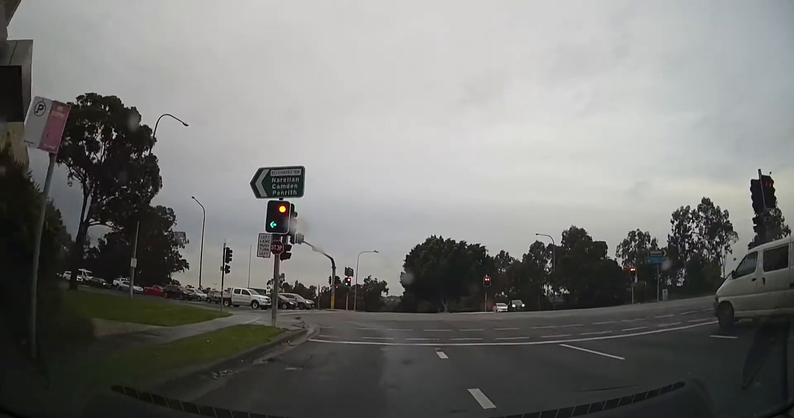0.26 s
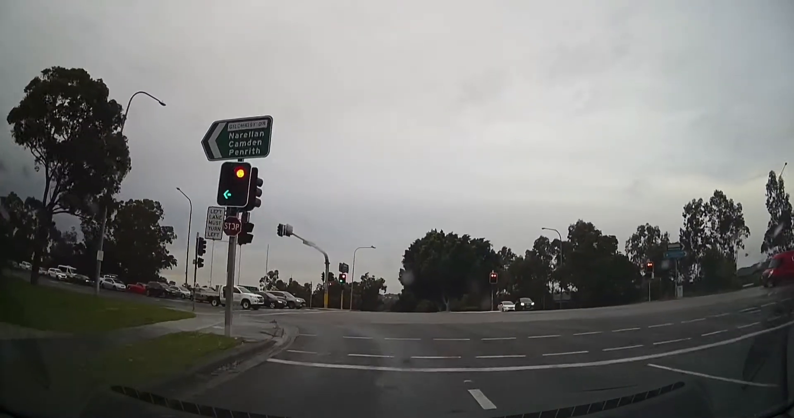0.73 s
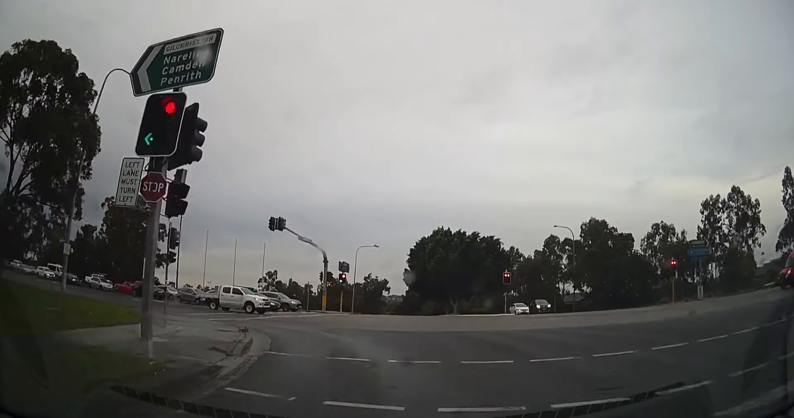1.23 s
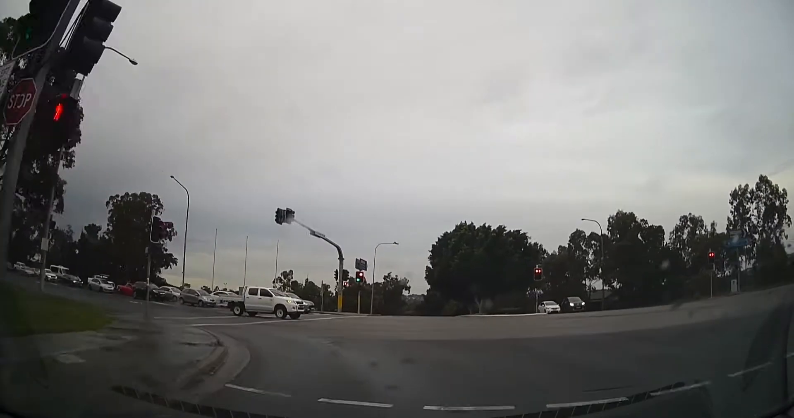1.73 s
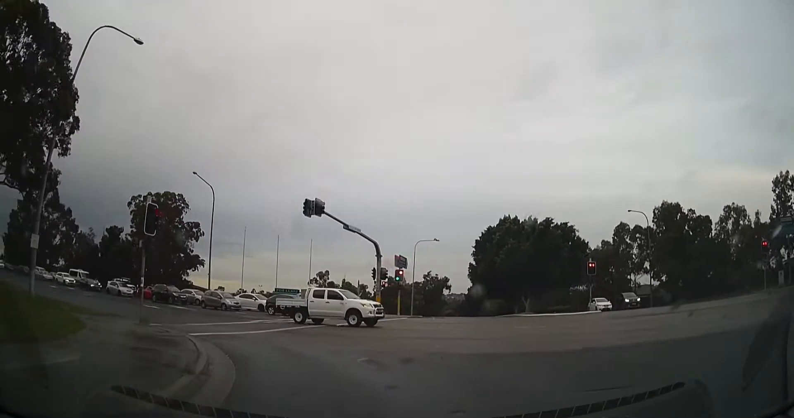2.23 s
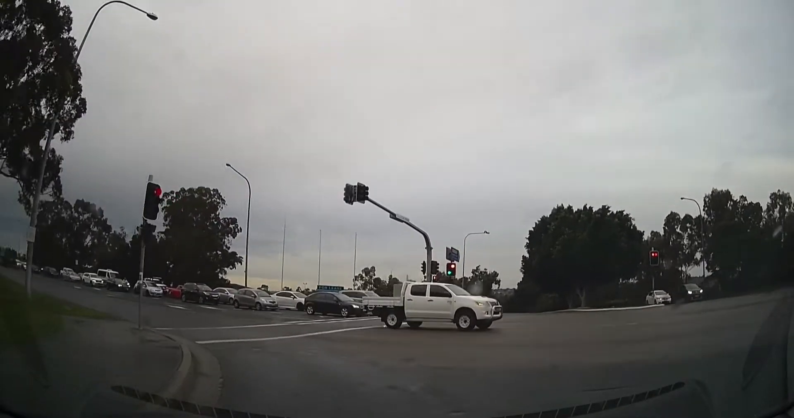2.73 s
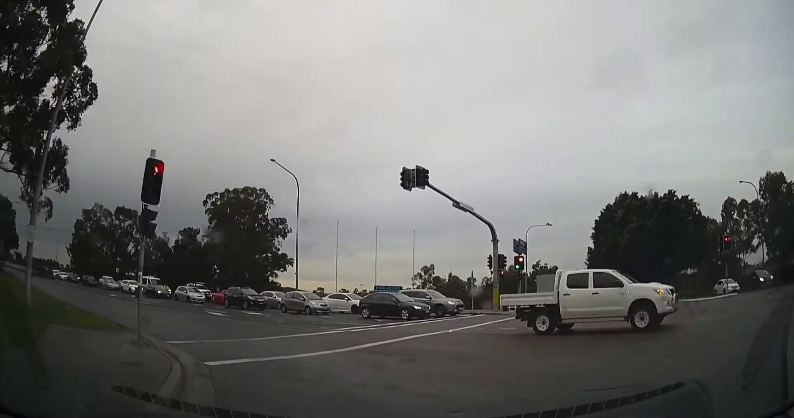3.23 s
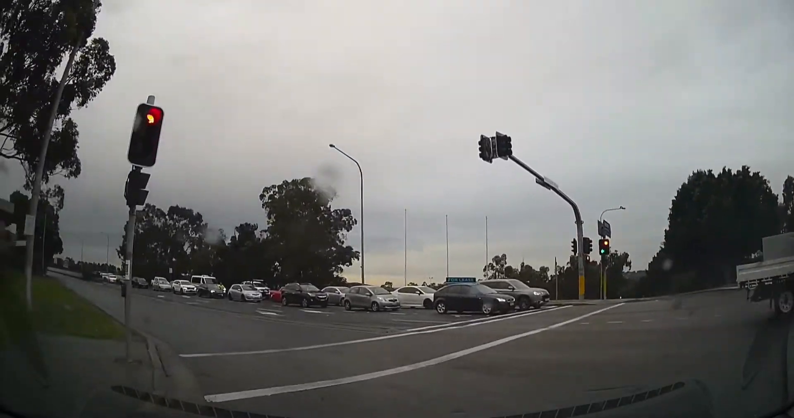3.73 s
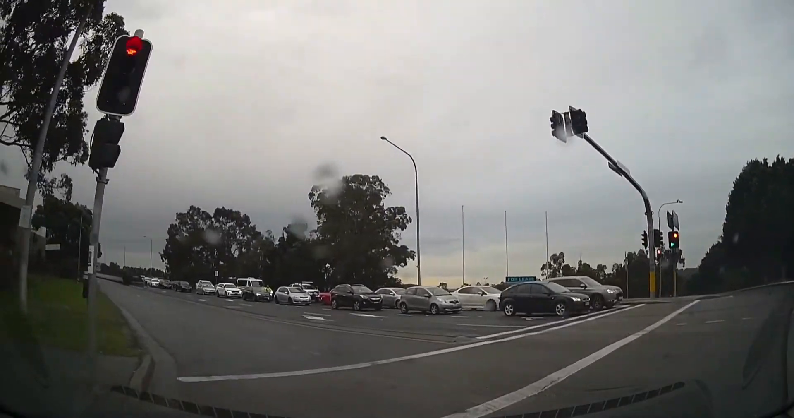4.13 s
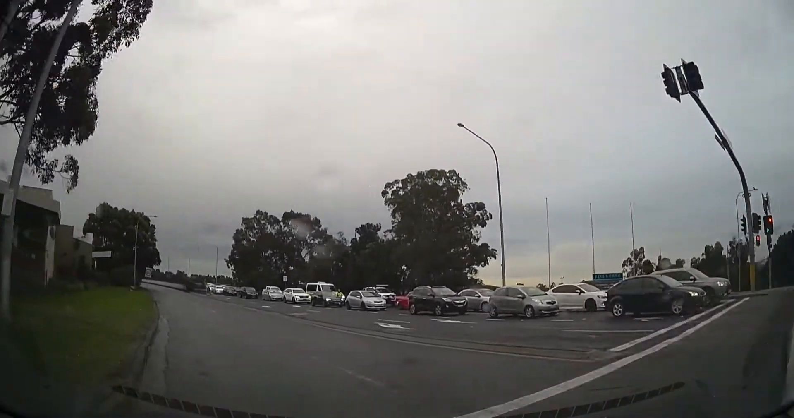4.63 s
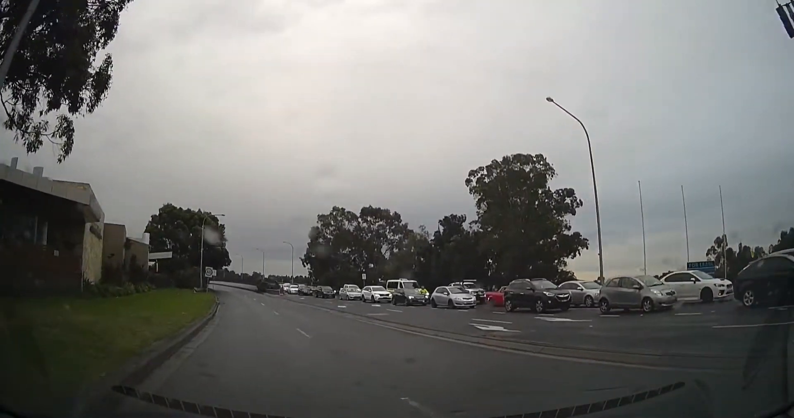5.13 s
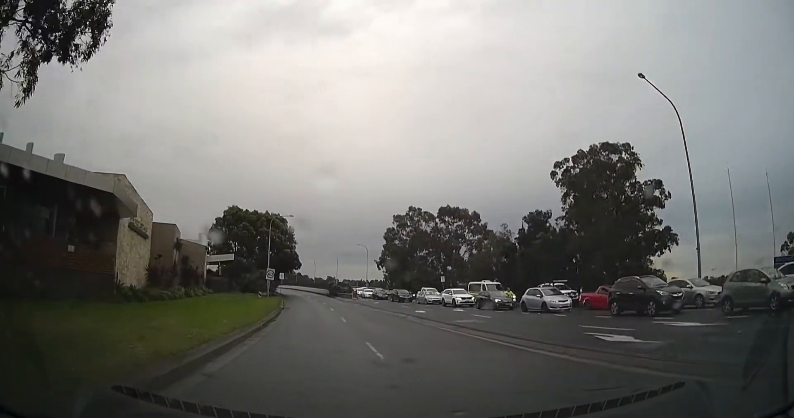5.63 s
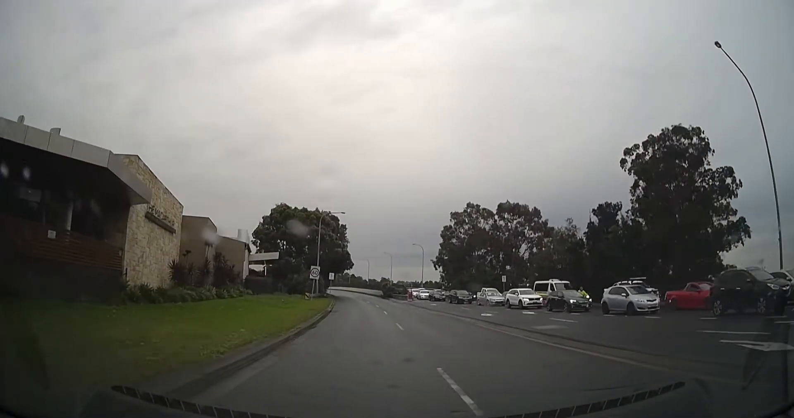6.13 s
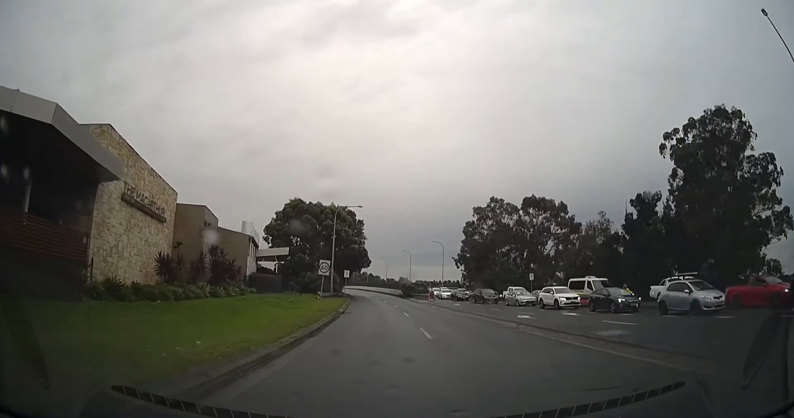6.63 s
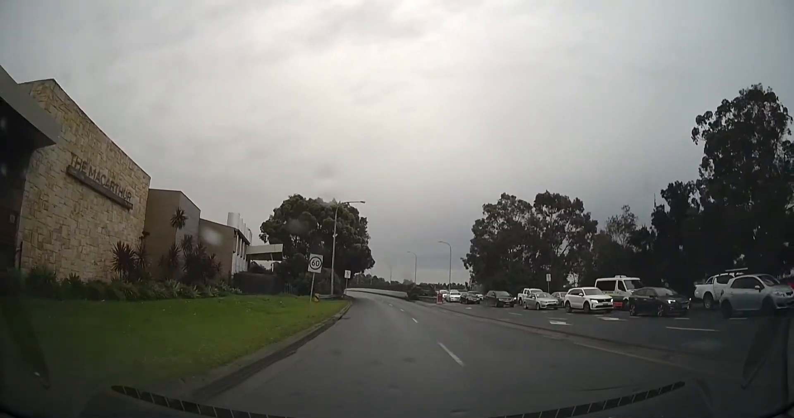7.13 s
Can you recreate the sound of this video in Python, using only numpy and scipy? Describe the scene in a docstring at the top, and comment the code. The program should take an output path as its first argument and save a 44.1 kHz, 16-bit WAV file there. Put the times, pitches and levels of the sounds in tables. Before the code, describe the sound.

The sound is heard inside a moving car: a continuous low road rumble with engine hum and tyre drone. The indicator ticks softly and evenly from about 0.3 seconds until just after 6. The tyres swish faintly on the wet road around 1 second, and the engine sags a little as the car slows for the turn. A plastic snap and a soft bump come just after 2 seconds, then a hollow panel knock at 2.5. From about 4 seconds the car picks up speed and the rumble swells over rough asphalt, strongest between 4.5 and 5, with light tyre slaps. A low thump lands at 5.6 seconds. Loose plastic trim clicks around it and at 6, then rattles and knocks sharply at 6.5. The rumble carries on to the end with faint wet swishes and a brief surge of tyre roar.

```python
"""Car turning on a wet road, from inside

The road shakes the cabin into a low rumble that swells over rough patches. The engine hums;
the tyres drone, roar and swish. Loose plastic trim clicks, knocks and rattles.
The indicator relay ticks against its stops until the turn is done."""
import sys
import numpy as np
from scipy import signal
from scipy.fft import rfft, irfft
from scipy.io import wavfile
from scipy.ndimage import uniform_filter1d

SR = 44100
rng = np.random.default_rng(int(sys.argv[2]) if len(sys.argv) > 2 else 0)


def bounce(signal):
    """Save signal as a 16-bit WAV file at the path given by the first command-line argument."""
    frames = np.transpose(np.atleast_2d(signal))
    limited = np.clip(frames, -1, 1)
    pcm = np.round(limited * 32767).astype(np.int16)
    wavfile.write(sys.argv[1], SR, pcm)


N = 325458
T = np.arange(N) / SR


def undb(db):
    """Decibels to gain."""
    return 10 ** (np.asarray(db) / 20)


def unit(x):
    """Scale to rms 1."""
    return x / np.sqrt(np.mean(x ** 2))


def add(out, start_s, sound):
    """Mix a sound in at start_s."""
    i = int(start_s * SR)
    out[i:i + len(sound)] += sound[:N - i]


def curves(table):
    """Each column after t/s, interpolated per sample."""
    times_s, *columns = np.transpose(table)
    return [np.interp(T, times_s, column) for column in columns]


def swells(events):
    """Gain of bell-shaped swells; lengths at half power."""
    power = sum(undb(db) ** 2 * .5 ** ((2 * (T - mid_s) / length_s) ** 2)
                for mid_s, length_s, db in events)
    return np.sqrt(power)


def walk(rate_hz):
    """Smooth random drift, spread near 1."""
    step = int(SR / rate_hz)
    return 1.29 * uniform_filter1d(np.repeat(rng.standard_normal(N // step + 1), step), step)[:N]


def noise(spectrum, flutter_db=0):
    """Noise, optionally fluttering, shaped to a spectrum with 20 dB/octave skirts; rms 1."""
    white = rng.standard_normal(N) * undb(flutter_db)
    hz, db = np.transpose(spectrum)
    bins_hz = np.maximum(np.fft.rfftfreq(N, 1 / SR), 1)
    outside_oct = np.abs(np.log2(bins_hz / np.clip(bins_hz, hz[0], hz[-1])))
    shape_db = np.interp(np.log(bins_hz), np.log(hz), db) - 20 * outside_oct
    return unit(irfft(rfft(white) * undb(shape_db), N))


def even_noise(spectrum, window_s):
    """Shaped noise, levelled to a running rms of 1."""
    x = noise(spectrum)
    return x / np.sqrt(uniform_filter1d(x ** 2, int(window_s * SR)))


def narrow_noise(hz, width_hz):
    """Noise band with a moving centre; rms 1."""
    phase = 2 * np.pi * np.cumsum(hz) / SR
    return unit(walk(width_hz) * np.cos(phase) + walk(width_hz) * np.sin(phase))


def contact(modes, t60_s, size=8192):
    """A sharp contact and its dying chatter ring broad modes; loudest 3 ms at rms 1."""
    t = np.arange(size) / SR
    chatter = rng.standard_normal(size) * undb(-60 * t / t60_s)
    chatter[0] += 9  # first impact
    ring = 0
    for hz, width_hz, db in modes:
        band = signal.butter(2, [hz - width_hz / 2, hz + width_hz / 2], "band", fs=SR, output="sos")
        ring = ring + undb(db) * unit(signal.sosfilt(band, chatter))
    return ring / np.sqrt(uniform_filter1d(ring ** 2, size=132).max())


def blows(events, modes, push_s, size=20000):
    """Soft blows: each short push sets damped modes swinging."""
    out, t = np.zeros(N), np.arange(size) / SR
    for start_s, level_db in events:
        ring = sum(undb(db - 60 * t / t60_s) * np.sin(2 * np.pi * hz * rng.normal(1, .01) * t)
                   for hz, db, t60_s in modes)
        ring *= 1 - np.exp(-(t / push_s) ** 2)
        add(out, start_s, undb(level_db) * np.sqrt(2) * ring / np.abs(ring).max())
    return out


def cabin_echoes(x, echo_db, t60_s, count=24):
    """Early reflections from glass and roof comb the sound."""
    lags_s = rng.uniform(0.002003, 0.041, count)
    gains = rng.choice([-1, 1], count) * undb(-60 * lags_s / t60_s)
    response = np.zeros(SR // 10)
    response[(lags_s * SR).astype(int)] = undb(echo_db) * gains / np.linalg.norm(gains)
    response[0] = 1
    return signal.fftconvolve(x, response / np.linalg.norm(response))[:N]


# car speed: t/s, v/(km/h)
SPEED = [(0, 29.8), (.5, 28.5), (1.5, 23), (2.6, 21.8), (3.4, 22.4), (4.3, 26.5), (5, 32.8), (6, 35.5),
         (7.38, 36.6)]
def rolling_db(cruise_db, doubling_db, cruise_kmh=30):
    """Rolling noise level, rising with each doubling of speed."""
    (kmh,) = curves(SPEED)
    return cruise_db + doubling_db * np.log2(kmh / cruise_kmh)


# rough patches: start/s, length/s, shake/dB, heave/dB, boom/dB, drone/dB
PATCHES = [(0.291, 0.48, 2, 7.5, 3, 0.5), (1.835, 0.15, 2.5, 9.5, 8, -0.5), (2.325, 0.41, 2, -2, 0.5, 2),
           (3.866, 0.28, 3.5, 0.5, 10.5, 0.5), (4.11, 0.21, 6.5, -9, -3, -2),
           (4.448, 0.28, 12.5, 8.5, 15.5, 7), (4.766, 0.39, 9, 18.5, 15, -2.5),
           (5.165, 0.23, 9.5, 4.5, 4.8, -1.5), (5.487, 0.2, 9, 0.5, 12.5, -0.5),
           (6.593, 0.1, -5.5, 0, 15, 1), (6.886, 0.19, -0.5, -4, 17.5, -0.5)]
def roughness_db(edge_s=0.14):
    """Shake, heave, boom and drone relative to smooth road, ramped at patch edges."""
    extra_db = 0
    for start_s, length_s, *patch_db in PATCHES:
        inside_s = np.minimum(T - start_s, start_s + length_s - T)
        extra_db = extra_db + np.outer(patch_db, np.clip(.5 + inside_s / edge_s, 0, 1))
    return extra_db


# rub spectrum: f/Hz, level/dB
RUB_SPECTRUM = [(2350, -23.5), (2700, -6), (2820, -8), (2950, -5), (3100, -10.5), (3400, -27.5)]
# rubs: centre/s, length/s, level/dB
RUBS = [(1.45, 0.32, -71.5), (2.3, 1, -69.5), (3.98, .42, -63), (7.33, 0.12, -59)]
# cornering whine: t/s, f/Hz, level/dB
WHINE = [(1.3, 3040, -90), (1.55, 2980, -77), (2, 3003, -72), (2.3, 2925, -72), (2.6, 2960, -69.5),
         (2.9, 2942, -75), (3.2, 2910, -89)]
# hiss spectrum: f/Hz, level/dB
HISS_SPECTRUM = [(1500, 2), (3000, -1.5), (4000, -3), (5300, -2.5), (7200, -7), (8500, -12)]
def hiss():
    """Faint steady hiss; thin rubs and a wavering whine come and go."""
    rub = swells(RUBS) * noise(RUB_SPECTRUM)
    hz, db = curves(WHINE)
    whine = undb(db) * narrow_noise(hz * (1 + 0.0066 * walk(12)), width_hz=70)
    return rub + whine + undb(-66) * noise(HISS_SPECTRUM)


# spray spectrum: f/Hz, level/dB
SPRAY_SPECTRUM = [(2800, -15), (4000, -6.5), (4700, -4.5), (5250, -3), (5900, -5), (7200, -11), (8500, -18)]
# swishes: centre/s, length/s, level/dB
SWISHES = [(0.848, 0.18, -58), (1.274, 0.25, -64), (6.723, 0.17, -66.5), (7.029, 0.24, -61.5)]
def spray(ring_hz=5210, sag_hz_per_s=1800, ring_db=-5):
    """The water film swishes under the tyres, each swish with a sinking resonance."""
    out = swells(SWISHES) * noise(SPRAY_SPECTRUM, flutter_db=1.8 * walk(240))
    for mid_s, length_s, db in SWISHES:
        ring = narrow_noise(ring_hz - sag_hz_per_s * (T - mid_s), width_hz=540)
        out += undb(ring_db) * swells([(mid_s, length_s, db)]) * ring
    return out


# carcass spectrum: f/Hz, level/dB
DRONE_SPECTRUM = [(150, -18.5), (210, 6.5), (260, 0), (330, -3.5), (410, -10), (510, -10), (590, -16.5),
                  (660, -28), (900, -25)]
# tread spectrum: f/Hz, level/dB
ROAR_SPECTRUM = [(350, -6), (510, -1), (640, -2.5), (760, 4), (870, -5), (1030, 0), (1110, -1.5),
                 (1250, -2.5), (1400, -9), (1630, -20), (1880, -13), (2400, -24), (2950, -23),
                 (3600, -31.5), (7000, -37.5)]
def tyres(surge_s=7.33, surge_length_s=0.078, surge_db=-40.5):
    """Carcass drone, spray and tread roar, which flutters with the asphalt grain and surges once."""
    *_, drone_db = roughness_db()
    drone = undb(rolling_db(-39, doubling_db=8.5) + drone_db) * noise(DRONE_SPECTRUM)
    surge = swells([(surge_s, surge_length_s, surge_db)])
    roar_gain = np.hypot(undb(rolling_db(-48, doubling_db=8.5)), surge)
    roar = roar_gain * noise(ROAR_SPECTRUM, flutter_db=1.2 * walk(45))
    return drone + cabin_echoes(roar + spray(), echo_db=-8.5, t60_s=0.028)


# tread slaps: t/s, level/dB
SLAPS = [(4.39, -40), (4.511, -40.5), (4.639, -42), (4.719, -41), (4.851, -39.5)]
# tread and wheel arch modes: f/Hz, width/Hz, level/dB
ARCH_MODES = [(534, 140, 4.5), (696, 120, 1), (953, 160, 0)]
def slaps():
    """The tread slaps broken asphalt and rings the wheel arches."""
    out = np.zeros(N)
    for start_s, db in SLAPS:
        add(out, start_s, undb(db) * contact(ARCH_MODES, t60_s=0.56))
    return out


# engine run: t/s, firing rate/Hz, level/dB
ENGINE_RUN = [(0, 42, -38.5), (.6, 38.37, -36), (1.2, 38.2, -34), (1.85, 43.78, -39.5), (2.3, 38.33, -33),
              (2.8, 36.52, -27), (3.3, 39.54, -34), (3.8, 41.2, -41), (5, 47.4, -33.5), (6, 47.5, -34),
              (7.38, 51.87, -42)]
# firing harmonics: order, level/dB
ENGINE_ORDERS = [(1, 5), (2, -18), (3, -11.5), (4, -6.5)]
def engine():
    """Low firing orders sag through the corner and pick up after it."""
    firing_hz, level_db = curves(ENGINE_RUN)
    phase = 2 * np.pi * np.cumsum(firing_hz * (1 + .015 * walk(9))) / SR
    hum = 0
    for order, order_db in ENGINE_ORDERS:
        waver_db = 2.2 * walk(7)
        hum = hum + undb(order_db + waver_db) * np.sin(order * phase + rng.uniform(0, 2 * np.pi))
    return undb(level_db) * unit(hum)


# panel shake spectrum: f/Hz, level/dB
SHAKE_SPECTRUM = [(50, -23), (64, -11), (78, 2), (92, -4), (109, 2.5), (128, -0.5), (152, -8), (171, -5),
                  (188, -11), (205, -7), (240, -21.5), (280, -24.5), (400, -42)]
# body heave spectrum: f/Hz, level/dB
HEAVE_SPECTRUM = [(12, -24), (22, -7), (33, -2), (47, 5), (54, -3.5), (63, -11), (78, -16), (90, -21),
                  (110, -35.5)]
# cabin air spectrum: f/Hz, level/dB
BOOM_SPECTRUM = [(95, -24.5), (105, -6.5), (109, -6.5), (113, -7), (124, -29.5)]
# wheels dropping over road joints: t/s, level/dB
BUMPS = [(2.15, -21), (5.60, -12)]
# car body modes: f/Hz, level/dB, t60/s
BODY_MODES = [(40, 4.5, 0.29), (74.2, -5, 0.069), (105, 3.5, 0.12)]
def road():
    """The road shakes the panels, heaves and bumps the body and sets the cabin air booming."""
    shake_db, heave_db, boom_db, _ = roughness_db()
    uneven_asphalt_db = 2 * walk(11)
    shake_db += rolling_db(-29.5, doubling_db=8) + uneven_asphalt_db
    heave_db += rolling_db(-33, doubling_db=7)
    boom_db += rolling_db(-37, doubling_db=7)
    shake = undb(shake_db) * even_noise(SHAKE_SPECTRUM, window_s=0.075)
    heave = undb(heave_db) * even_noise(HEAVE_SPECTRUM, window_s=0.41)
    boom = undb(boom_db) * even_noise(BOOM_SPECTRUM, window_s=0.31)
    return shake + heave + boom + blows(BUMPS, BODY_MODES, push_s=0.018)


# trim clicks: t/s, level/dB, f/Hz favoured by the struck spot, t60/s, falloff from f/(dB/octave)
TRIM_CLICKS = [(0.13, -46, 1400, .09, 12), (.246, -55, 3230, 0.027, 10), (1.1, -47, 1170, .04, 12),
               (1.443, -40, 1976, 0.056, 3), (1.468, -44.5, 2200, 0.077, 2),
               (1.656, -44.5, 1101, 0.079, 12), (1.943, -39.5, 1340, 0.06, 8),
               (3.142, -41.5, 1200, 0.041, 12), (3.721, -42, 901, 0.13, 7), (4.845, -45, 1210, .035, 3),
               (4.995, -49.5, 3210, 0.055, 20), (5.006, -36.5, 2000, 0.041, 3),
               (5.452, -49, 2480, 0.058, 5), (5.641, -31.5, 2853, 0.016, 7),
               (5.656, -28.5, 1320, 0.056, 19), (5.684, -43, 1500, 0.023, 8),
               (5.91, -40.5, 1354, 0.039, 18), (5.943, -33, 1530, 0.13, 19), (5.988, -45, 2050, .11, 6),
               (6.04, -31, 1400, 0.062, 7), (6.046, -43, 4300, 0.07, 14), (6.053, -34, 1480, 0.072, 6),
               (6.085, -33.5, 1180, 0.15, 7.5), (6.433, -41.5, 3670, 0.1, 1),
               (6.455, -25.5, 1718, 0.085, 6), (6.473, -32, 3045, 0.09, 1),
               (6.489, -18.5, 1140, 0.074, 6.5), (6.508, -25.5, 1490, 0.083, 4.5),
               (6.527, -29.5, 830, 0.16, 4.5)]
# trim modes: f/Hz, width/Hz, level/dB
TRIM_MODES = [(807, 140, 6.5), (1072, 200, 9.5), (1320, 120, 6), (1530, 80, -2), (1840, 220, 3),
              (2050, 130, 0), (2930, 330, -0.5), (3550, 430, -4.5), (3920, 230, -7), (5320, 640, -6),
              (5900, 1600, -13)]
# stiff catch modes: f/Hz, width/Hz, level/dB
CATCH_MODES = [(1253, 830, 2), (1840, 540, 0.5), (2950, 230, -3.5), (3560, 530, 0.5), (5570, 440, -3.5),
               (5900, 1400, -10)]
# panel knocks: t/s, level/dB
KNOCKS = [(2.4905, -30), (2.4975, -19.5), (6.458, -27), (6.491, -24), (6.529, -24), (6.549, -25)]
# panel modes: f/Hz, level/dB, t60/s
PANEL_MODES = [(511, -1.5, 0.092), (562, 3, 0.04), (647, -4.5, 0.028), (750, -10.5, 0.017)]
def trim(catch_s=2.1295, catch_db=-25.5):
    """Loose plastic clicks and rattles, a catch snaps once, heavier blows knock a hollow panel."""
    out = np.zeros(N)
    for start_s, level_db, spot_hz, t60_s, falloff_db_per_oct in TRIM_CLICKS:
        modes = [(hz, width_hz, db - falloff_db_per_oct * abs(np.log2(hz / spot_hz)))
                 for hz, width_hz, db in TRIM_MODES]
        add(out, start_s, undb(level_db) * contact(modes, t60_s))
    add(out, catch_s, undb(catch_db) * contact(CATCH_MODES, t60_s=0.064))
    return out + blows(KNOCKS, PANEL_MODES, push_s=0.002)


# armature modes, pulling in: f/Hz, width/Hz, level/dB
PULL_IN_MODES = [(1950, 600, -1), (3140, 500, -1), (4260, 390, 4), (5150, 370, -4.5)]
# armature modes, letting go: f/Hz, width/Hz, level/dB
RELEASE_MODES = [(1970, 430, 2.5), (2950, 570, -1.5), (4850, 380, 1), (5340, 220, -1.5)]
# relay box modes: f/Hz, level/dB, t60/s
BOX_MODES = [(393, -2, 0.098), (483, -0.5, 0.073), (564, -9.5, 0.12)]
# dashboard modes: f/Hz, level/dB, t60/s
DASH_MODES = [(750, -7.5, 0.028), (1011, -6, 0.043), (1153, -2.5, 0.041), (1272, -1, 0.046),
              (1364, -5.5, 0.042), (1496, -8.5, .035), (1830, -19, 0.034), (2050, -21.5, 0.019)]
def indicator(start_s=.3025, period_s=.6999, on_s=.339, flashes=9):
    """Twice a flash the relay armature snaps on a stop, thuds its box, seats and knocks the dash."""
    seat_s, scatter_db, box_offset_db = 0.0012, 3, -1.5
    strokes = ((0, PULL_IN_MODES, -55, -36), (on_s, RELEASE_MODES, -53, -37.5))
    out = np.zeros(N)
    for delay_s, modes, snap_db, knock_db in strokes:
        times_s = start_s + delay_s + period_s * np.arange(flashes)
        for s in times_s:
            add(out, s, undb(snap_db) * contact(modes, t60_s=0.052))
        thuds = [(s, knock_db + box_offset_db) for s in times_s]
        out += blows(thuds, BOX_MODES, push_s=0.0018)
        seatings = [(s + seat_s, knock_db + rng.normal(0, scatter_db)) for s in times_s]
        out += blows(seatings, DASH_MODES, push_s=.003)
    return out


def scene():
    """Mono sum in the cabin."""
    return (road() + slaps() + engine() + tyres() + hiss() + indicator() + trim())[None]


def record(dry):
    """Steep low-pass on the top treble."""
    cutoff_hz = 7450
    return signal.sosfilt(signal.cheby1(8, .3, cutoff_hz, fs=SR, output="sos"), dry)


dry = scene()
out = record(dry)
bounce(out)
```